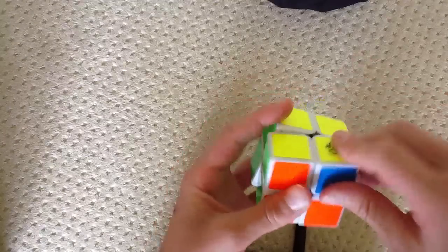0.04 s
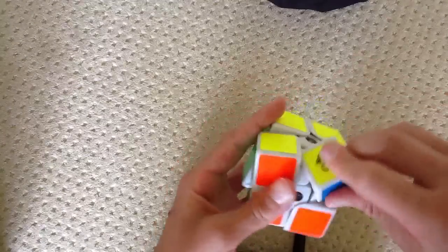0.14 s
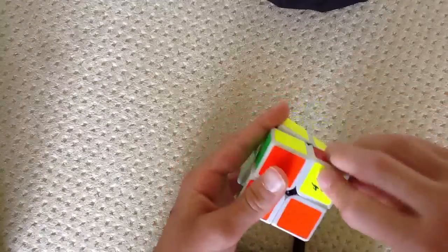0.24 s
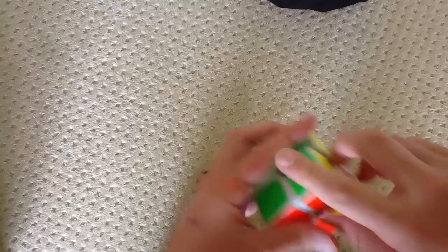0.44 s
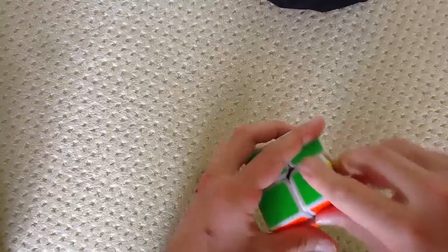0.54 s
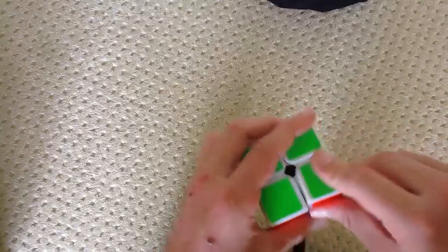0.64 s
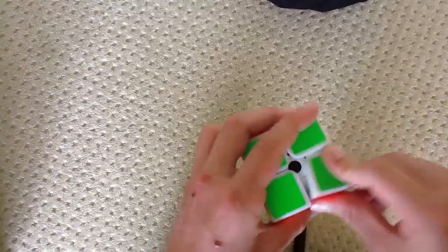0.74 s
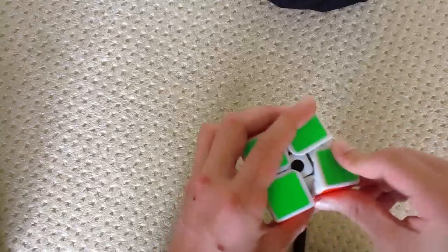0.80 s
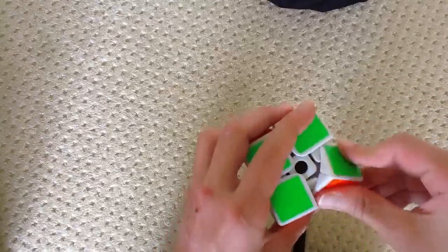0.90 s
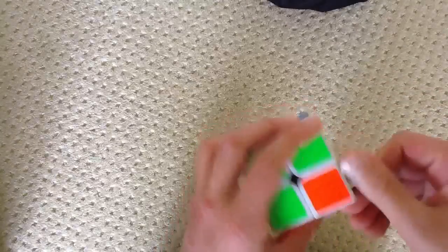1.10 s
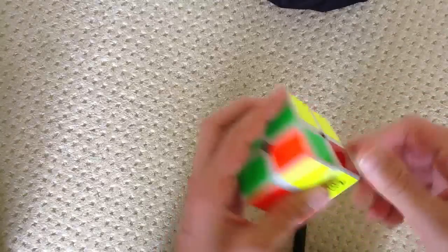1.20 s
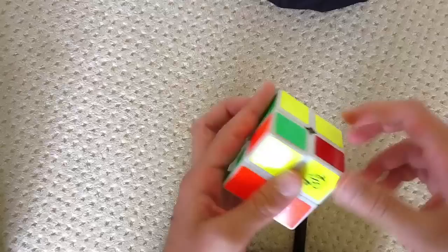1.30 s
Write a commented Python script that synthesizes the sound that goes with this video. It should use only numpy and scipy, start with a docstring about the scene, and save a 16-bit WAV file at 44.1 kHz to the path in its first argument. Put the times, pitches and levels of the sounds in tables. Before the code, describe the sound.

A plastic puzzle cube is turned by hand, close up in a small quiet room with faint hush. Ticks and a brief hollow scrape at 0.05-0.2 seconds lead to a loud, ringing clack at 0.24. Faint ticks come near 0.5 and 0.67, livelier ticks and slides at 0.8-0.95, then a brighter sharp clack at 1.04 with a short room tail, and a barely audible tick at 1.2.

```python
"""A plastic puzzle cube is turned by hand, close by, in a small quiet room with a faint steady hush.
First loose pieces tick as the fingers shift, and sliding layers rub and ring the hollow core.
Then a layer snaps home: its pieces collide in a quick cluster that rings the shell, a loud clack
that the room answers, and the hollow cube rings on faintly. More ticks and slides lead to a second clack,
and one last light tick follows. Blows and friction are noise bursts and grains through resonant filters."""
import sys
import numpy as np
from scipy import signal
from scipy.fft import rfft, irfft
from scipy.io import wavfile
from scipy.ndimage import uniform_filter1d

SR = 44100
rng = np.random.default_rng(int(sys.argv[2]) if len(sys.argv) > 2 else 0)


def inscribe(sig):
    """Save sig as 16-bit PCM at rate SR to the path in sys.argv[1].

    A 1-D sig is mono; a 2-D sig holds one channel per row.
    Samples are clipped to [-1, 1] before scaling.
    """
    pcm = np.round(np.clip(np.atleast_2d(sig).T, -1, 1) * 32767)
    wavfile.write(sys.argv[1], SR, pcm.astype(np.int16))


N = 59535  # length in samples
DECAY_60DB = np.log(1000)  # exp(-DECAY_60DB * t / t60) has dropped 60 dB at t60


def amp(db):
    """Decibels to gain."""
    return 10 ** (np.asarray(db) / 20)


def read(points, hz):
    """A curve's value at hz, interpolated on a log frequency axis."""
    f, value = np.transpose(points)
    return np.interp(np.log(hz + 1), np.log(f + 1), value)


def add(mix, s, sound):
    """Mixes a sound in at time s."""
    part = mix[max(round(s * SR), 0):][:len(sound)]
    part += sound[:len(part)]


def body(x, colour, modes=(), size=4096):
    """Passes x through a causal filter of unit energy: a broad colour lifted by resonances."""
    hz = np.fft.rfftfreq(size, 1 / SR)
    db = read(colour, hz)
    for f, width, lift in modes:
        db = db + lift / (1 + (2 * (hz - f) / width) ** 2)
    # fold the cepstrum to get minimum phase, so the ring starts at once
    cepstrum = irfft(np.log(amp(db)))
    cepstrum[1:size // 2] *= 2
    cepstrum[size // 2 + 1:] = 0
    ring = irfft(np.exp(rfft(cepstrum)))
    return signal.fftconvolve(x, ring / np.linalg.norm(ring))[:N]


# Colour of the background. Each row: frequency in Hz, relative level in dB.
HUSH_COLOUR = [(25, -46), (70, -27.5), (100, -19), (135, -6), (230, 1), (330, -4.5), (600, -6.5),
               (1200, -11.5), (3000, -10), (6000, -12), (10000, -15), (15000, -16)]
# Loudness of the background over time. Each row: time in seconds, level in dB.
HUSH_LEVEL = [(0, -63.5), (0.452, -66.5), (.75, -66.5), (1.001, -68.5), (1.2, -73.5), (1.35, -71)]


def hush():
    """Faint steady background of the room: coloured noise with a slowly drifting level."""
    level_db = np.interp(np.arange(N) / SR, *np.transpose(HUSH_LEVEL))
    return body(rng.standard_normal(N), HUSH_COLOUR) * amp(level_db)


# How long the room rings. Each row: frequency in Hz, time to fall 60 dB in seconds.
ROOM_T60 = [(100, 0.15), (500, 0.26), (1200, 0.35), (3300, 0.41), (6000, 0.42), (10000, 0.36),
            (15000, 0.15)]
# Colour of the diffuse tail. Each row: frequency in Hz, level in dB relative to ROOM_DB.
ROOM_COLOUR = [(40, -23), (170, -20), (400, -3), (850, 6.5), (1050, 1.5), (1330, 6), (1650, -4.5),
               (2050, 1.5), (2450, -2), (3200, 2.5), (5500, -3.5), (9000, -2), (15000, 1.5)]
# Echoes off nearby surfaces. Each row: delay in seconds, level in dB.
ECHOES = [(.0047, -15), (.0078, -22), (.0098, -18.5), (0.0115, -21.5), (0.0281, -30)]
ROOM_DB, ROOM_ONSET_S = -10.5, .007  # gain and delay of the diffuse tail


def room(x, size=256):
    """A few near echoes and a diffuse tail: each band stores the sound's energy and lets it die at its own rate."""
    hop = size // 4
    hz, _, z = signal.stft(x, SR, nperseg=size, noverlap=size - hop)
    power = abs(uniform_filter1d(abs(z) ** 2, size=3, axis=0))
    keep = np.exp(-2 * DECAY_60DB * hop / SR / read(ROOM_T60, hz))  # energy kept per hop
    stored = np.array([signal.lfilter([1 - k], [1, -k], band) for k, band in zip(keep, power)])
    # the stored energy shapes fresh noise
    diffuse = signal.stft(rng.standard_normal(N), nperseg=size, noverlap=size - hop)[2]
    colour = amp(ROOM_DB + read(ROOM_COLOUR, hz))[:, None]
    field = diffuse / diffuse.std() * np.sqrt(stored) * colour
    tail = signal.istft(field, nperseg=size, noverlap=size - hop)[1]
    out = np.zeros(N)
    add(out, ROOM_ONSET_S, tail)
    for delay, db in ECHOES:
        add(out, delay, amp(db) * x)
    return out


def smear(x):
    """Travel through the interlocked pieces spreads each edge over a fraction of a millisecond (allpass filters)."""
    for hz in (2800, 4200, 6500, 11000):
        _, poles = signal.iirpeak(hz, 2.2, SR)
        x = signal.lfilter(poles[::-1], poles, x)
    return x


def blows(rows, scatter, ring_s, size=2048):
    """Each blow is a sharp push followed by a few milliseconds of dense rattle."""
    out, t = np.zeros(N), np.arange(size) / SR
    for s, db in rows:
        rattle = rng.standard_normal(size) * np.exp(-DECAY_60DB * t / ring_s)
        blow = scatter * rattle / np.linalg.norm(rattle)
        blow[0] = 1  # the push itself
        add(out, s, amp(db) * blow / np.linalg.norm(blow))
    return out


GRAINS_PER_S = 12000


def friction(rows, spread_db):
    """Random slip grains whose strength swells and fades with the speed of the layer."""
    t = np.arange(N) / SR
    strength = rng.standard_normal(N) * amp(spread_db * rng.standard_normal(N))
    grains = strength * (rng.random(N) < GRAINS_PER_S / SR)
    swell = sum(amp(db) * np.exp(-((t - middle) / half) ** 2) for middle, half, db in rows)
    return grains / grains.std() * swell


# Light touches of loose pieces. Each row: start in seconds, level in dB before TICK_DB, pitch of the piece in Hz.
TICKS = [ (0.0497, -45, 3000), (0.0823, -31, 4000), (0.0938, -38, 4000), (0.098, -39, 4500),
         (0.101, -33, 3500), (0.1025, -25, 4200), (0.1065, -24, 2900), (0.1155, -36, 3000),
         (0.121, -37, 5000), (0.128, -37, 3800), (0.1303, -37, 3200), (0.1426, -33, 3600),
         (0.1672, -29, 7800), (0.169, -29, 2800), (0.1783, -31, 3300), (0.1803, -34, 6000),
         (0.1823, -34, 3000), (0.2135, -41, 5500), (0.504, -45, 4000), (0.5086, -38, 3400),
         (0.5125, -32, 2800), (0.5308, -37, 4400), (0.5338, -36, 3000), (0.5365, -36, 3000),
         (0.6383, -42, 6000), (0.6526, -43, 3500), (0.6623, -42, 4000), (0.6658, -37, 3800),
         (0.6721, -36, 3000), (0.6846, -41, 5500), (0.6861, -39, 2800), (0.707, -47, 3500),
         (0.7883, -39, 3500), (0.7906, -31, 3200), (0.794, -39, 4500), (0.8015, -41, 3500),
         (0.804, -40, 3000), (0.812, -32, 4200), (0.8142, -37, 5500), (0.8205, -30, 3800),
         (0.8273, -32, 2800), (0.8391, -34, 4300), (0.9121, -22, 4500), (0.9186, -37, 6000),
         (0.9297, -36, 4200), (0.9378, -33, 3500), (0.954, -39, 3300), (1.204, -42, 8500), ]
# Colour of a light touch, also of the rubbing faces. Each row: frequency in Hz, relative level in dB.
TICK_COLOUR = [(40, -33.5), (200, -9.5), (800, -14), (1300, -3), (2100, -0.5), (2900, -0.5), (5200, -1),
               (7500, -7), (11000, -14), (15000, -24)]
TICK_SCATTER, TICK_RING_S = 1.5, .009  # rattle: share, t60
TICK_DB = 1.5  # gain of all ticks
TICK_PIECE_DB, PIECE_RING_S = -10.5, .003  # the piece's own ring: level relative to its tick, decay time


def ticks():
    """Loose pieces touch lightly, each with a brief ring of its own."""
    out = blows([row[:2] for row in TICKS], TICK_SCATTER, TICK_RING_S)
    t = np.arange(SR // 20) / SR
    for s, db, hz in TICKS:
        ring = t * np.sin(2 * np.pi * hz * t) * np.exp(-DECAY_60DB * t / PIECE_RING_S)
        add(out, s, amp(db + TICK_PIECE_DB) * ring / np.linalg.norm(ring))
    return amp(TICK_DB) * body(out, TICK_COLOUR)


# Slides of a layer. Each row: middle in seconds, half length in seconds, level in dB.
SLIDES = [(0.108, 0.033, -57.5), (0.176, .026, -51.5), (0.673, 0.033, -69), (0.823, 0.03, -59.5),
          (0.945, 0.029, -56.5)]
# Catches of a sliding layer that knock the core. Each row: start in seconds, level in dB.
KNOCKS = [(0.107, -25), (0.112, -27), (0.1175, -35), (0.1615, -39.5), (0.169, -30.5), (0.1785, -35),
          (0.1875, -40), (0.2194, -27.5), (0.9297, -28), (0.9328, -28.5), (0.937, -28.5), (0.9505, -36),
          (0.954, -42.5)]
# Colour of the hollow core. Each row: frequency in Hz, relative level in dB.
CORE_COLOUR = [(40, -49), (120, -30), (250, -22), (800, -28), (1250, -5), (1900, 1.5), (2200, -10.5),
               (2800, -3), (5000, -13), (15000, -20.5)]
# Resonances of the core. Each row: frequency in Hz, width in Hz, lift in dB.
CORE_MODES = [(1240, 110, 8), (1666, 130, 6), (1920, 110, 2)]
KNOCK_SCATTER, KNOCK_RING_S = .8, .014  # rattle: share, t60
GRAIN_SPREAD_DB = 3.5  # unevenness of the grains
SURFACE_RUB_DB = -8.5  # rub of the faces, relative to the slide that rings the core


def slides():
    """Friction grains and a few catches ring the hollow core; the faces add a brighter rub."""
    sliding = friction(SLIDES, GRAIN_SPREAD_DB)
    catches = blows(KNOCKS, KNOCK_SCATTER, KNOCK_RING_S)
    core = body(sliding + catches, CORE_COLOUR, CORE_MODES)
    rub = body(friction(SLIDES, GRAIN_SPREAD_DB), TICK_COLOUR)
    return core + amp(SURFACE_RUB_DB) * rub


# The whole cube thuds against the fingers.
# Each row: start in seconds, pitch in Hz, t60 in seconds, level in dB before the soft rise.
THUDS = [(.2375, 341, 0.033, -38), (.239, 706.3, .03, -26), (.24, 928, 0.015, -37.5),
         (1.042, 241.5, 0.047, -45), (1.042, 487, 0.0083, -36.5)]
# The hollow cube rings on after the first clack. Each row: the same four columns and units.
AFTER_RINGS = [(.24, 1220, .24, -41), (.24, 1350, .28, -44)]
THUD_RISE_S = 0.0028  # time constant of the soft rise


def thuds():
    """Rings of the whole cube with a soft rise, most of them quickly damped by the hands."""
    out, t = np.zeros(N), np.arange(SR // 10) / SR
    for s, hz, t60, db in THUDS + AFTER_RINGS:
        envelope = (1 - np.exp(-t / THUD_RISE_S)) * np.exp(-DECAY_60DB * t / t60)
        add(out, s, amp(db) * np.sin(2 * np.pi * hz * t) * envelope)
    return out


# Collisions of the pieces, one list for each clack. Each row: start in seconds, level in dB before CLACK_DB.
CLACKS = [
    [(.2243, -31), (.2256, -23), (.2283, -19), (.2312, -15), (.2332, -11), (.235, -9), (.2375, 1),
     (.2392, 2), (.2403, 0), (.2419, -3), (.243, -7)],
    [(1.033, -36), (1.0364, -22), (1.0414, -10), (1.0421, -2), (1.0433, 0), (1.0442, -1), (1.046, 3),
     (1.0503, -12)],
]
# Force of each clack: one gain in dB per clack.
CLACK_DB = [3.5, 2.5]
# Corners grinding just before and during each snap, one list for each clack.
# Each row: middle in seconds, half length in seconds, level in dB.
GRINDS = [
    [(.2315, 0.0081, -39), (.2395, 0.0034, -20)],
    [(1.038, 0.0061, -48), (1.0442, 0.0022, -13)],
]
# Colour of the shell in each grip, one list for each clack. Each row: frequency in Hz, relative level in dB.
SHELLS = [
    [(40, -47), (120, -33.5), (350, -19), (750, -10.5), (1700, -7.5), (3000, -2), (5600, -0.5),
     (7900, -5.5), (8800, -9.5), (15000, -14)],
    [(40, -57.5), (120, -31.5), (350, -18.5), (800, -17), (1700, -9), (3500, -0.5), (5600, -1), (7900, -4),
     (11000, -8.5), (15000, -12)],
]
# Resonances of the shell in each grip, one list for each clack.
# Each row: frequency in Hz, width in Hz, lift in dB.
SHELL_MODES = [
    [(660, 90, -6), (1237.7, 71, 15.5), (1336, 50, 12), (2463, 85, 13.5), (3050, 160, 6.5), (3306, 330, 4),
     (3773, 310, 3), (4480, 200, 2), (5320, 120, 3.5), (6000, 76, -2), (6660, 130, 6), (7900, 250, 6.5)],
    [(498, 160, 14.5), (1250, 120, 5), (1743, 400, 12.5), (2606, 200, 9.5), (3442, 420, 10.5),
     (3853, 140, 7.5), (4750, 140, 4), (5260, 190, 14), (5180, 190, -3), (7000, 200, 9), (8690, 140, 4.5),
     (10125, 230, 9.5)],
]
CLACK_SCATTER, CLACK_RING_S = 0.96, .007  # rattle: share, t60
GRIND_SPREAD_DB = 2  # unevenness of the grinding grains


def clacks():
    """Layers grind, snap home and ring the shell; one track for each clack."""
    tracks = []
    for rows, db, grind, shell, modes in zip(CLACKS, CLACK_DB, GRINDS, SHELLS, SHELL_MODES):
        collisions = amp(db) * blows(rows, CLACK_SCATTER, CLACK_RING_S)
        grinding = friction(grind, GRIND_SPREAD_DB)
        tracks.append(body(collisions + grinding, shell, modes))
    return tracks


# How strongly each clack radiates into the room: one gain in dB per clack.
CLACK_SEND_DB = [0.5, -2.5]


def scene():
    """The cube, its room and the background; the rings of the whole cube are heard only close by."""
    snaps = clacks()
    handling = ticks() + slides()
    close = smear(sum(snaps) + handling + thuds())
    radiated = sum(amp(db) * snap for db, snap in zip(CLACK_SEND_DB, snaps))
    return (close + room(radiated + handling) + hush())[None]


EDGE_HZ = 15350


def record(dry):
    """The recorder's band limit: a steep low-pass."""
    lowpass = signal.firwin(255, EDGE_HZ, window=("kaiser", 8), fs=SR)
    return signal.oaconvolve(dry, lowpass[None], "same")


dry = scene()
out = record(dry)
inscribe(out)
```